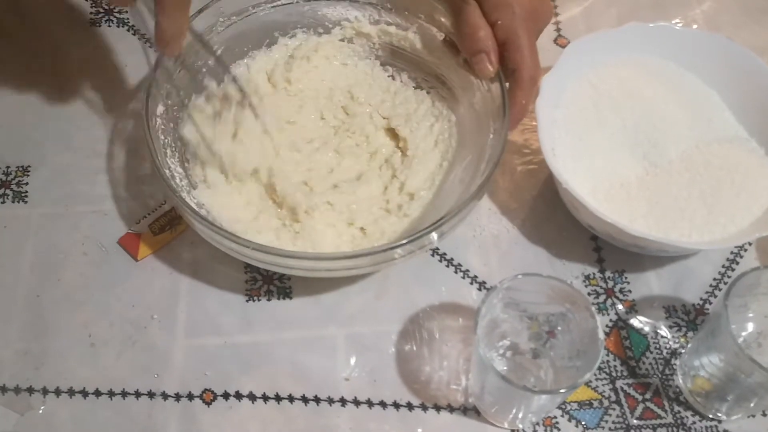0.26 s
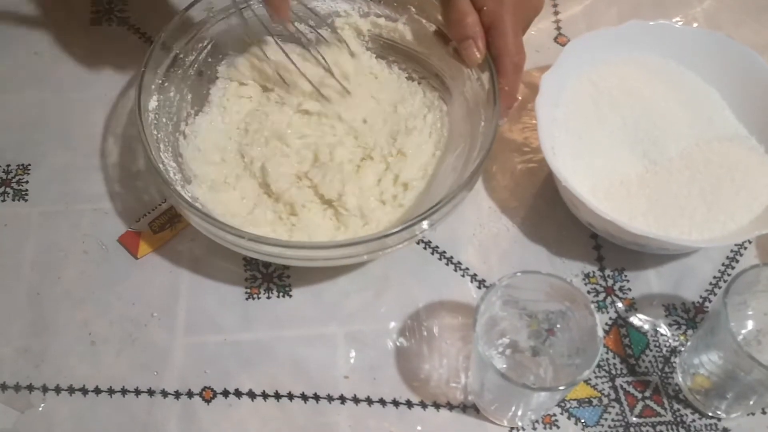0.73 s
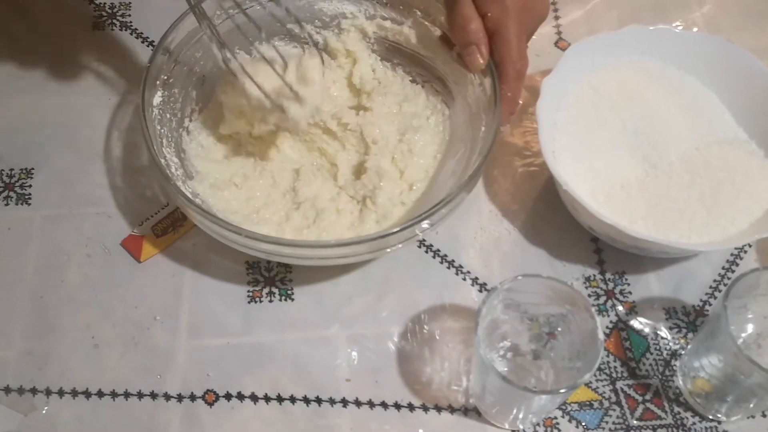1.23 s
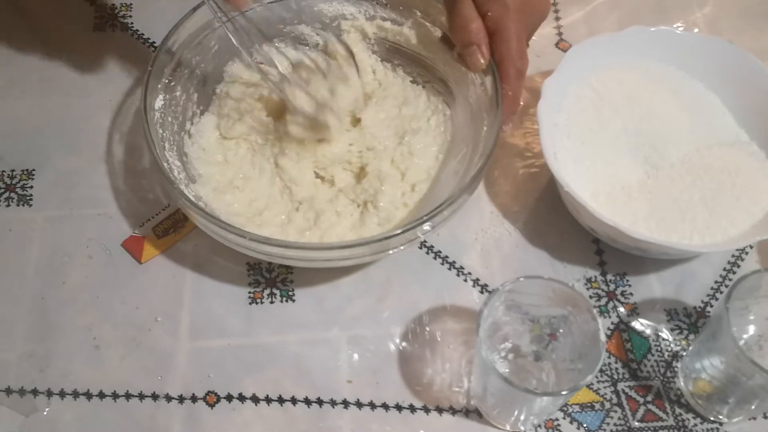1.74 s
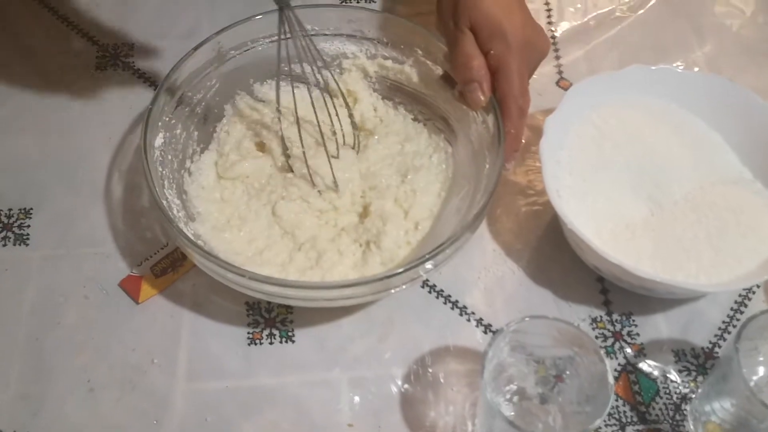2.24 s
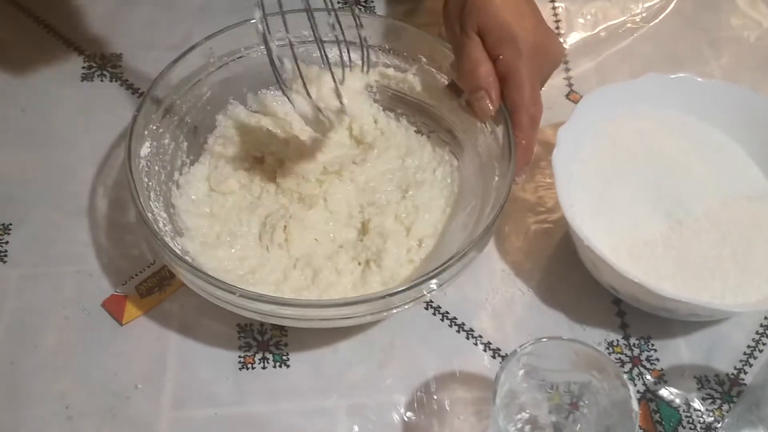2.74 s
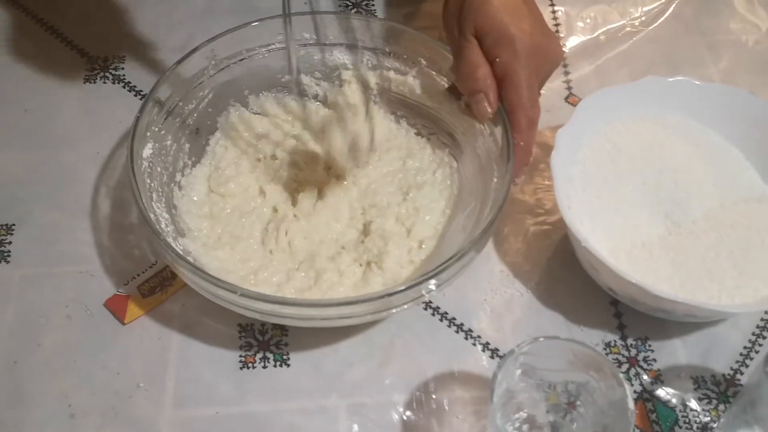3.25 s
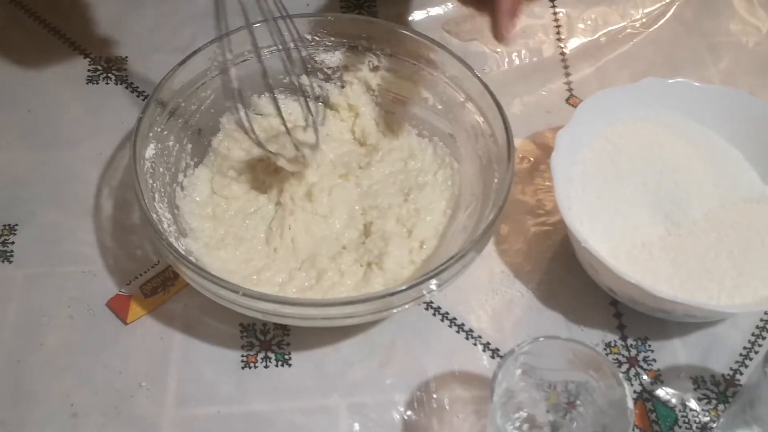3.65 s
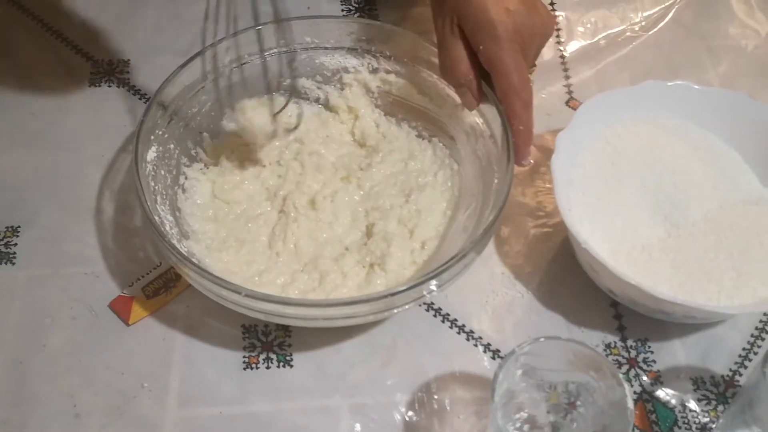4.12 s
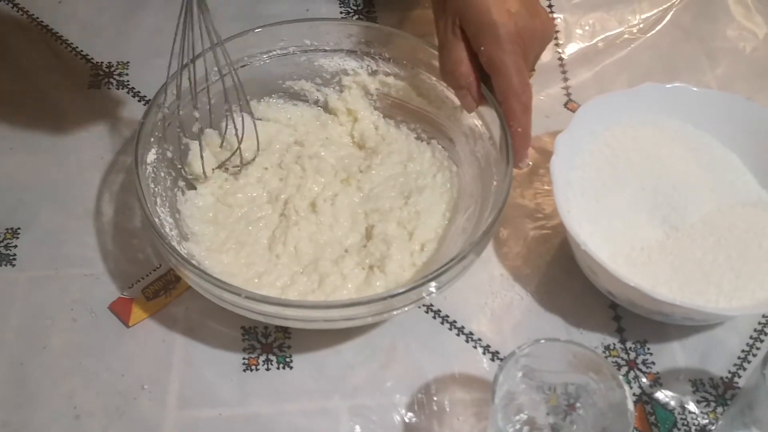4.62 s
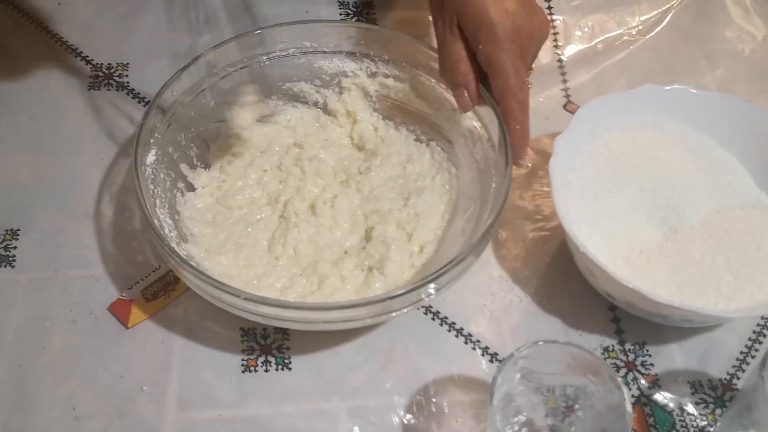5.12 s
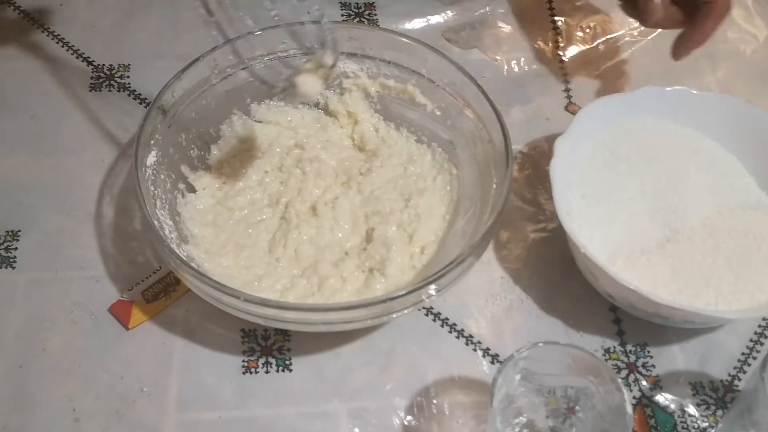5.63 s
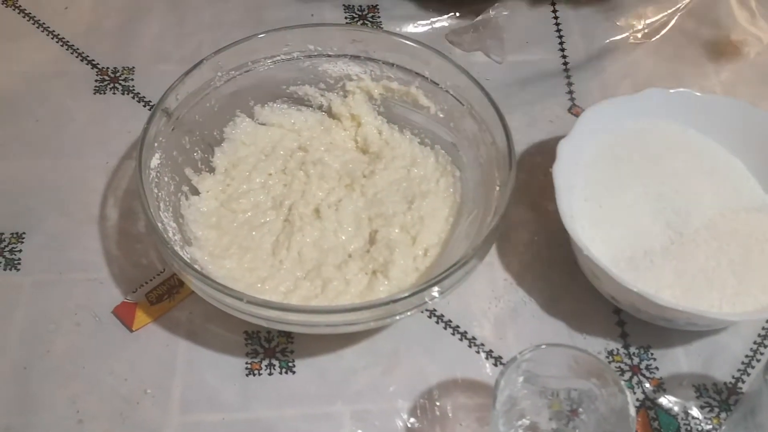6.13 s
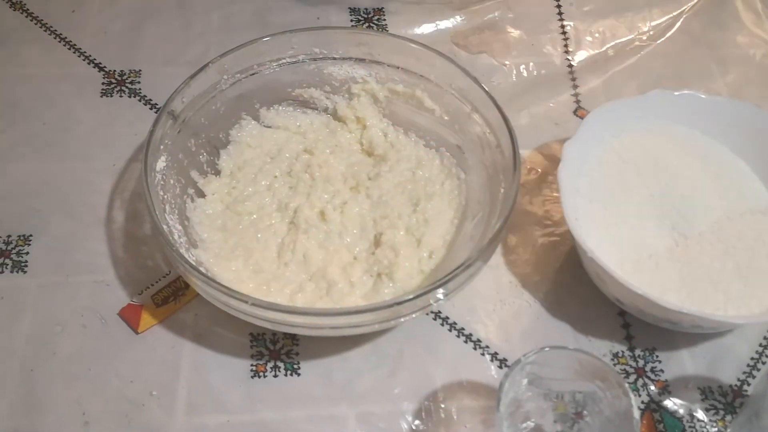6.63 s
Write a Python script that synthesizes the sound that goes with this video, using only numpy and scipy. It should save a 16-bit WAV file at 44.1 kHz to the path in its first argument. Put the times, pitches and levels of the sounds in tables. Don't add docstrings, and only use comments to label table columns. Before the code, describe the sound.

A wire whisk stirs sticky dough in a glass bowl, shakes off wet slaps, then knocks seven ringing clinks on the rim.

```python
import sys
import numpy as np
from scipy import signal
from scipy.fft import rfft, irfft, next_fast_len
from scipy.io import wavfile
from scipy.ndimage import uniform_filter1d

SR = 44100
rng = np.random.default_rng(int(sys.argv[2]) if len(sys.argv) > 2 else 0)


def bounce(signal):
    frames = np.transpose(np.atleast_2d(signal))
    limited = np.clip(frames, -1, 1)
    pcm = np.round(limited * 32767).astype(np.int16)
    wavfile.write(sys.argv[1], SR, pcm)


def to_linear_factor(level_db):
    exponent = np.asarray(level_db, float) / 20
    return 10 ** exponent


N = 302967
T = np.arange(N) / SR


def shaped(x, points):
    hz, db = np.transpose(points)
    size = next_fast_len(x.shape[-1])
    bins = np.log(np.maximum(np.arange(size // 2 + 1) * SR / size, 1))
    y = irfft(rfft(x, size) * to_linear_factor(np.interp(bins, np.log(hz), db)), size)[..., :x.shape[-1]]
    return y / np.sqrt(np.mean(y ** 2))


def fade(t, t60):
    return to_linear_factor(-60 * t / max(t60, 1e-3))


def walk(rate_hz):
    k = int(SR / rate_hz)
    held = np.repeat(rng.standard_normal(N // k + 1), k)
    return 1.25 * uniform_filter1d(uniform_filter1d(held, k), k)[:N]


def swell(s, held_s, db, rise_db_s, fall_db_s):
    return to_linear_factor(db - rise_db_s * np.maximum(s - T, 0) - fall_db_s * np.maximum(T - s - held_s, 0))


def add(out, s, sound, pan_db=0):
    i = int(s * SR)
    n = min(sound.shape[-1], N - i)
    out[:, i:i + n] += sound[..., :n] * to_linear_factor(np.array([[pan_db], [-pan_db]]) / 2)


def air():
    # frequency in Hz, level in dB per Hz.
    air_spectrum = [(12, -36), (20, -5), (150, -10), (193, -18.5), (248, -19), (293, -20), (459, -25.5),
                    (642, -29.5), (849, -25.5), (1440, -25), (2080, -19), (2990, -28.5), (5680, -35),
                    (14700, -45), (16000, -48.5)]
    air_db, hum_hz, hum_db = -65.5, 241, -77
    mid, side = rng.standard_normal((2, N))
    side = signal.sosfilt(signal.butter(1, 700, "high", fs=SR, output="sos"), side)
    noise = shaped(mid + 2.0 * side * np.array([[1], [-1]]), air_spectrum) * to_linear_factor(air_db + 1.2 * walk(2.4))
    hum = np.sin(2 * np.pi * hum_hz * T + .5 * walk(7.9))
    return noise + to_linear_factor(hum_db + 2.8 * walk(13.0)) * hum


def dough():
    # start in s, held in s, hiss in dB, 2 kHz rub in dB relative.
    stroke_rows = [(0.0, 0.18, -56, -1.5), (.24, 0.094, -52.5, 0.5), (0.369, 0.1, -51, -1),
                   (0.722, 0.08, -58, 5.5), (.89, 0.076, -51, -7.5), (1.018, 0.21, -60, -6),
                   (.8, 0.052, -75.5, 9.5), (1.07, 0.031, -71.5, 7), (1.15, .06, -82.5, 11),
                   (1.36, 0.049, -78.5, 16.5), (1.46, 0.072, -66.5, 8.5), (1.88, 0.11, -79.5, 14.5),
                   (2.05, 0.22, -85.5, 13.5), (3.525, 0.016, -75.5, -4), (3.57, 0.054, -69.5, -3.5),
                   (3.785, 0.02, -64, -4), (3.872, 0.01, -65, -9), (1.64, 0.036, -58, -12.5),
                   (2.68, 0.015, -65, -4), (2.91, 0.013, -83, -13), (3.13, 0.031, -77.5, 3),
                   (5.805, 0.014, -78, 8), (2.29, 0.077, -83, 26.5), (2.392, 0.026, -54, 3),
                   (5.562, 0.035, -60.5, 8.5), (5.829, 0.1, -44, -0.5), (6.001, 0.11, -53, -2),
                   (6.212, 0.021, -59, 6.5), (6.369, 0.033, -63, 0.5), (6.44, 0.036, -59, 5.5)]
    # time in s, hiss in dB, 2 kHz rub in dB relative.
    peel_rows = [(0.687, -52.5, 10), (1.534, -32.5, -6), (1.781, -51.5, -7), (2.596, -47.5, 2.5),
                 (2.652, -52, 5), (2.817, -52.5, -1.5), (2.89, -49, -13), (3.059, -51.5, -6),
                 (3.115, -57, 1), (3.298, -53, -1.5), (3.358, -66, 16.5), (3.514, -66, 9), (3.6, -67, 4),
                 (3.815, -81, 24)]
    # start in s, held in s, level in dB.
    fold_rows = [(.39, 0.049, -72), (.74, 0.092, -70.5), (.92, 0.19, -76.5), (2.25, 0.11, -78.5),
                 (2.39, 0.15, -75), (2.62, 0.092, -74), (3.1, 0.21, -79)]
    # frequency in Hz, level in dB per Hz.
    hiss_spectrum = [(1650, -35.5), (2800, -10.5), (3240, -12), (3640, 0), (3860, -14.5), (4400, -4.5),
                     (5680, 2.5), (6200, -1.5), (11000, -5), (14700, -20), (15500, -16), (16000, -50.5)]
    # frequency in Hz, level in dB per Hz.
    rub_spectrum = [(240, -40.5), (400, -42.5), (537, -54), (775, -22), (898, -25.5), (1260, -15.5),
                    (2090, 1), (2470, -3.5), (3600, -13.5), (4680, -20), (7920, -120)]
    # frequency in Hz, level in dB per Hz.
    fold_spectrum = [(300, -24), (520, -5), (650, -8.5), (830, 5.5), (1000, -10.5), (1500, -27)]
    # centre in Hz, width in Hz, level in dB.
    squeak_rows = [(830, 160, -20.5), (1304, 200, -16.5), (1795, 150, -9), (2117, 140, -12.5),
                   (2520, 180, -15)]
    stroke_db_s = 331, 289.5
    peel_db_s = 3000, 314
    hiss_spread = 1

    hiss_grains, rub_grains, side_grains = [
        rng.standard_normal(N) * to_linear_factor(3 * np.minimum(rng.exponential(size=N), 4.5)) for _ in range(3)]

    hiss = shaped(hiss_grains + hiss_spread * side_grains * np.array([[1], [-1]]), hiss_spectrum)
    hiss = hiss * to_linear_factor(2.0 * walk(34) + 2.0 * walk(110)) * to_linear_factor(np.array([[1.0], [-1.0]]))

    rub = shaped(rub_grains, rub_spectrum) * to_linear_factor(1.4 * walk(65) + 2.1 * walk(180))
    rub = rub * to_linear_factor(np.array([[-3.0], [3.0]]))
    for hz, width, db in squeak_rows:
        peak = [(hz - 3 * width, -40), (hz - width / 2, -3), (hz, 0), (hz + width / 2, -3), (hz + 3 * width, -40)]
        band = shaped(rub_grains, peak)
        rub = rub + to_linear_factor(db + 6.0 * walk(18)) * band * to_linear_factor(np.array([[-3.5], [3.5]]))

    moves = [(swell(s, held, db, *stroke_db_s), rub_db) for s, held, db, rub_db in stroke_rows]
    moves += [(swell(s, 0, db, *peel_db_s), rub_db) for s, db, rub_db in peel_rows]
    hiss_gain = sum(gain for gain, _ in moves)
    rub_gain = sum(gain * to_linear_factor(rub_db) for gain, rub_db in moves)

    fold_gain = sum(swell(s, held, db, *stroke_db_s) for s, held, db in fold_rows)
    fold = shaped(side_grains, fold_spectrum) * to_linear_factor(2.5 * walk(29.92)) * fold_gain
    return fold + to_linear_factor(-10.0) * (hiss * hiss_gain + rub * rub_gain)


def table():
    # time in s, peak in dB, boom in Hz, boom t60 in s, panels in dB relative.
    blow_rows = [(0.691, -54, 50, 0.76, -7), (1.531, -39.5, 43.4, 0.59, 5), (2.597, -34.5, 57.1, 0.31, -15),
                 (2.821, -40, 56.6, 0.15, -19.5), (2.891, -52, 57.3, 0.19, -11.5),
                 (3.063, -40, 58.8, 0.35, -22.5), (3.2985, -35, 59.7, 0.19, -21.5),
                 (3.515, -51, 52.4, 0.51, -12.5), (3.813, -34.5, 49.3, 0.16, -32),
                 (3.875, -45, 46.7, 0.18, -31.5), (3.941, -36, 57.5, 0.39, 0.5),
                 (4.29, -30, 60.1, 0.51, -6.5), (4.593, -32.5, 59.8, 0.49, -0.5),
                 (4.814, -36, 59.8, 0.39, -3.5), (4.995, -44.5, 59, 0.3, 1),
                 (5.167, -46.5, 51.4, 0.74, 9.5), (5.334, -54.5, 45.7, 0.47, 9.5)]
    # frequency in Hz, level in dB, t60 in s.
    panel_modes = [(165, -7, 0.16), (191, -13.5, 0.21), (260.3, 6, 0.1), (290, -9.5, 0.12),
                   (306, -11, 0.29), (439.6, -17.5, 0.023), (620, -9.5, 0.078), (895, -10, 0.16)]
    # time in s, rumble in dB.
    rocking_rows = [(0.0, -48.5), (0.2, -58.5), (0.36, -66), (0.75, -82), (1.4, -61.5), (2.2, -58),
                    (3.7, -67.5), (5.6, -61.5), (5.85, -72.5), (6.3, -81), (6.85, -61)]
    push_s = 0.0046
    panel_drift, panel_scatter_db = .04, 2.5
    rock_after_blow_db, rock_fall_db_s, rock_spread = -12.5, 75, .25

    out, t = np.zeros((2, N)), T[:SR // 2]
    dent = to_linear_factor(2.5) * np.sin(2 * np.pi * 154.3 * t) * fade(t, 0.024)
    thud = to_linear_factor(2) * np.sin(2 * np.pi * 85 * t + 2.0) * fade(t, 0.11)
    sway = to_linear_factor(-3) * np.sin(2 * np.pi * 30.6 * t - .6) * fade(t, 0.14)
    push = (1 - np.exp(-t / push_s)) ** 2
    for s, db, hz, t60, panel_db in blow_rows:
        boom = np.sin(2 * np.pi * hz * t - 1.3) * fade(t, t60) + sway + dent
        drift = 1 + panel_drift * rng.standard_normal(len(panel_modes))
        modes = np.array([to_linear_factor(d) * np.sin(2 * np.pi * f * k * t) * fade(t, ring)
                          for (f, d, ring), k in zip(panel_modes, drift)])
        mode_gain = to_linear_factor(panel_db + panel_scatter_db * rng.standard_normal(len(panel_modes)))
        add(out, s, to_linear_factor(db) * (boom + thud + mode_gain @ modes) * push)

    noise = rng.standard_normal(N) + rock_spread * rng.standard_normal((2, N))
    rumble = shaped(noise, [(15, -25.0), (30, -0.5), (70, -5.0), (100, -6.0), (170, -20.0), (400, -62.5)])
    rock_s, rock_db = np.transpose(rocking_rows)
    rocking = to_linear_factor(np.interp(T, rock_s, rock_db, -110, -110))
    for s, db, *_ in blow_rows:
        rocking = rocking + (T > s) * swell(s, 0, db + rock_after_blow_db, 0, rock_fall_db_s)
    return out + rumble * rocking * to_linear_factor(-8.5 + 1.6 * walk(9.2))


def ticks():
    # time in s, treble peak in dB, 2 kHz slap in dB relative, brightness in dB per octave.
    tick_rows = [(0.237, -59, 6, -12), (0.272, -52.5, 14, -10), (0.409, -45, 4, -23),
                 (0.6864, -45.5, 18.5, -9), (0.6911, -34.5, -30, -13), (0.7289, -36, 3.5, -10),
                 (0.392, -61, 21, -8), (1.171, -46, 3.5, 1), (1.522, -31.5, -6, -17),
                 (1.5354, -24.5, 9, -26), (1.5445, -38, 14, -13), (1.78, -41.5, -3, -5.5),
                 (1.9028, -59, 10, 0), (5.813, -60.5, 12, -3), (2.387, -35.5, -0.5, 5),
                 (2.6, -28, -11, -20), (2.655, -30.5, -4.5, -22), (2.6694, -45.5, -16, 12),
                 (2.82, -45.5, -4, -5), (2.894, -44, 9, -18), (3.0607, -47, 2, 5), (3.069, -55, -2, -14),
                 (3.1158, -38, -19, 3), (3.1647, -53, -1, -10), (3.3024, -34.5, -15, -15),
                 (3.3609, -28.5, -23, -21.5), (3.519, -49.5, -16, -22), (3.61, -62, -12, 5),
                 (3.8147, -63.5, 13, -5), (2.595, -43, 3, -16), (2.781, -62, -15, -3),
                 (2.876, -49, -19, -22), (3.295, -57, -15, 6), (3.345, -50, -15, -20),
                 (3.352, -50, -15, -18), (3.366, -42, -7, -21), (3.819, -64, 15, -12), (3.833, -66, 11, -1),
                 (1.526, -40, 11, -16)]
    # frequency in Hz, level in dB per Hz.
    tick_spectrum = [(1760, -46), (3000, -21), (4300, -16), (5600, 5.5), (6700, 0), (9800, 11),
                     (13500, -25), (16000, -48)]
    # frequency in Hz, level in dB per Hz.
    slap_spectrum = [(150, -53.5), (250, -15.5), (340, -16), (514, -38), (758, -10), (1110, -25), (1800, 2),
                     (2120, 8), (2650, -15.5), (2950, -9.5), (4200, -30), (5460, -65), (9240, -120)]
    tick_pan_db, tick_scatter_db, slap_pan_db = 12, 10.5, -7.5

    out, t = np.zeros((2, N)), T[:SR // 8]
    tail = 0.29 * fade(t, 0.057)
    for s, db, slap_db, tilt_db in tick_rows:
        pan_db = tick_pan_db + tick_scatter_db * rng.standard_normal()
        noise = rng.standard_normal((2, len(t)))
        noise[:, 24] = 9
        tilted = [(hz, d + tilt_db * np.log2(hz / 6000)) for hz, d in tick_spectrum]
        tick = shaped(noise[0], tilted) * (fade(t, 0.0021) + tail)
        slap = shaped(noise[1], slap_spectrum) * (fade(t, 0.047) + tail)
        add(out, s, to_linear_factor(db - 11.0) * tick, pan_db)
        add(out, s, to_linear_factor(db - 12.0 + slap_db) * slap, slap_pan_db)
    return out


def ported(points, share, low_db):
    # frequency in Hz, left minus right in dB.
    clatter_pan = [(700, 13), (1800, -5.5), (4200, 3), (6500, 7), (10000, -6.5), (14000, -1.5)]
    hz, db = np.transpose(clatter_pan)
    return [(f, d + share * np.interp(np.log(f), np.log(hz), db) + low_db * (f < 1500)) for f, d in points]


def rim():
    # time in s, ring in dB, brightness in dB per octave, place on the rim in radians,
    # clatter in dB.
    knock_rows = [
        (0.2837, -35.5, -4, 0.035, -55),
        (3.9412, -8, 2.2, 0.085, -12.5),
        (4.2878, 1.5, -7, -0.082, -13),
        (4.5961, 0, -1, -0.041, -13.5),
        (4.8087, -11, 5, 0.08, -21.5),
        (4.9923, -9, 4, -0.19, -14.5),
        (5.1633, -9.5, 7.5, 0.017, -13),
        (5.3291, 0.5, 1, -0.063, -18),
    ]
    # second wire's gap in s, second wire in dB, third wire in dB,
    # share of the free ring time the dough allows.
    late_wires = [(0.002, 6, 3, 0.54), (.0035, 0, -3.5, 1.11), (.0028, 2.5, 3.5, 1.17),
                  (0.0024, -4.5, 3.5, 0.97), (0.007, 9.5, -4, 0.86), (0.0026, -1.5, 3, 1.4),
                  (.004, 3, 2, 0.86), (0.005, 5.5, 0.1, 0.97)]
    last_wires_s = [.0032, 0.0086, .0056, .0055, 0.018, 0.0045, .009, 0.009]
    clatter_low_db = [-3.1, 2.5, 3.5, -0.4, 0.3, -2.5, -0.2, -7]
    # frequency in Hz, level in dB per Hz.
    clatter_spectrum = [(180, -59), (300, -31.5), (856, -21.5), (2280, 1), (2880, -17), (3700, 6.5),
                        (3950, -29.5), (4200, -35.5), (4480, -11), (4990, 1.5), (5610, -9), (6620, -1),
                        (12300, -11), (14500, -24), (15600, -49.5)]
    # frequency in Hz, t60 in s.
    rim_modes = [(485, .45), (1262, .28), (1245, .15), (2293, .2), (2313, .12), (3537, .22), (3678, .05),
                 (4945, .2), (5090, .12), (6556, .24), (6966, .2), (8275, .17), (8408, .12), (10125, .22),
                 (12140, .16), (14240, .16)]
    held_share = [1.15, 0.84, 0.68, 1.133, 1.1, 1.1, 1.2, 0.85, 0.79, 0.96, 1.2, 0.94, 0.96, 1.1, 1.3, 1.05]
    # level in dB, left minus right in dB, left port's lead in radians.
    radiation = [(-8, -7, 0.32), (10, -3.5, 1.7), (0, -2.5, 0.62), (-2.5, -11, 1.5), (-16, -3.5, 4.2),
                 (3, 2, 2.17), (-2, -0.5, 2.4), (-1, 1.5, 0.95), (-5, 2, 2.2), (6, 4.5, 4.12),
                 (-19, 0.5, 1.6), (-4.5, -2, 2.1), (-1.5, 9.5, 0.52), (1, -14, 2.4), (-5.5, -7, 4.7),
                 (-3, -6, 1.6)]
    # level in dB when struck on a crest,
    # radians from the zero mark to a crest times the wave count.
    wave_rows = [(-26.5, 1.35), (-29, 2.9), (3, 1.04), (-3.5, .84), (-9, 1.25), (-19, .14), (-17, 2.66),
                 (-23, 2.4), (-13.5, 2.29), (-21.5, 2.11)]
    # level of 2, 3, 4, 5, 6, 7 waves in dB.
    grip_rows = [(0.1, -9, -2, -0.5, 3, -2), (0.1, -4, 0.67, -8, -2.9, 6.5), (0.1, -4.5, 0.1, 1, 1, -3),
                 (0.09, 1, 0.1, -6, -9, -1.5), (4.3, -0.5, 0.1, 0, -0.5, -2.5),
                 (3.6, -4.5, -2.7, 2, 0.5, 7.5), (18, -1.5, -2, -0.8, -0.5, -1.4),
                 (0.12, -2, -0.56, -8.5, 5.5, -0.4)]
    # level of 8, 9, 10, 11 waves in dB.
    grip_high_rows = [(-2, .1, .1, .1), (1, .1, -3, 2.1), (-2, .1, 0.5, .1), (1.7, .1, -1.5, 2.1),
                      (0.8, .1, -2.1, 2.1), (.1, 1.1, 0, 2.1), (-2.3, .1, -1.5, 2.1), (-2.5, .1, -2.5, 2.1)]
    # twins of 4, 5, 6, 7 waves in dB,
    # ring left minus right in dB.
    twin_rows = [(.1, .1, .1, .1, -4.5), (3.1, .1, .1, 1.3, -0.5), (3.1, .1, 0.12, 1.3, -0.6),
                 (.1, .1, .1, .1, 1.5), (.1, .1, .1, 4, 0.5), (.1, .1, .1, 0.3, 1.9),
                 (3.1, 1.9, .1, -3.3, -0.3), (.1, .1, .1, -2.2, 1.5)]
    # time after the knock in s, loss in dB,
    # share of the ring that dies early.
    settle_rows = [(.03, -6, 1), (.09, -15, 0.4), (0.088, -2, 0.7), (0.025, -2.5, 0.86), (0.028, -4, 0.93),
                   (0.018, -2.5, 1.5), (0.0088, -1, 0.98), (.05, -0.5, 1.1)]
    settle_s, node_leak = 0.0051, .02

    out, wire_noise, t = np.zeros((2, N)), np.zeros((2, N)), T[:SR // 3]
    noise_t = t[:2000]
    hz, t60 = np.transpose(rim_modes)[:, :, None]
    mode_db, pan_db, lead = np.transpose(radiation)[:, :, None]
    port_gain = to_linear_factor(np.array([pan_db, -pan_db]) / 2)
    port_phase = np.exp(1j * np.array([lead, 0 * lead]))
    order = np.array([2, 3, 3, 4, 4, 5, 5, 6, 6, 7, 7, 8, 8, 9, 10, 11])[:, None]
    crest_db, crest = np.transpose(wave_rows)[:, order - 2]
    rough_depth = np.where((order == 4) | (order > 8), .55, .36)

    rows = zip(knock_rows, late_wires, last_wires_s, clatter_low_db,
               grip_rows, grip_high_rows, twin_rows, settle_rows)
    for knock, late, last_s, low_db, grip_db, high_db, (*twin_db, side_db), settle in rows:
        s, db, tilt_db, place, clatter_db = knock
        gap_s, late_db, last_db, free = late
        settle_at_s, lost_db, early = settle

        share_db = crest_db + 10 * np.log10(np.cos(order * place - crest) ** 2 + node_leak)
        share_db = share_db + tilt_db * np.log2(np.maximum(hz / 2300, 1))
        share_db = share_db + np.append(grip_db, high_db)[order - 2]
        share_db[4:11:2, 0] += twin_db

        swing, total = 0, 0
        for delay, wire_db in [(0.00033, 0.0053), (gap_s, late_db), (last_s, last_db)]:
            push = to_linear_factor(wire_db) * np.exp(.7j * rng.standard_normal(hz.shape))
            swing = swing + push * np.sin(np.pi / 2 * np.clip((t - delay) / .0006, 0, 1)) ** 2
            total = total + push
            noise = rng.standard_normal(2000) + 10.0 * rng.standard_normal((2, 2000))
            clatter = np.array([shaped(port, ported(clatter_spectrum, side, low_db))
                                for port, side in zip(noise, (.5, -.5))])
            clatter = clatter * fade(noise_t, 0.024) * np.minimum(noise_t / 0.00045, 1)
            add(wire_noise, s + delay, to_linear_factor(clatter_db + wire_db) * clatter, 0.3)

        detuned_hz = hz * (1 + .002 * rng.standard_normal(hz.shape))
        decay = to_linear_factor(-60 * t / (t60 * free * np.array(held_share)[:, None]))
        decay = decay * (0.33 + early * (hz > 2000) * fade(t, 0.055))
        decay = decay * to_linear_factor(lost_db * np.clip((t - settle_at_s) / settle_s, 0, 1))
        ring = swing / np.abs(total) * np.exp(2j * np.pi * detuned_hz * t)
        ring = ring * to_linear_factor(db + mode_db + share_db) * decay

        jolts = rng.standard_normal((2, len(hz), 41)) + 1j * rng.standard_normal((2, len(hz), 41))
        jolts = signal.resample(jolts, len(t), axis=-1)
        rough = 1 + rough_depth * np.minimum(t / .04, 1) * jolts
        add(out, s, np.sum(ring * rough * port_gain * port_phase, axis=1).imag, side_db)
    return out, wire_noise


def band_clicks(rows):
    out, t = np.zeros((2, N)), T[:2000]
    for s, db, hz, pan_db, t60 in rows:
        band = [(hz / 5, -22), (hz / 1.4, -3), (hz, 0), (hz * 1.3, -6), (hz * 1.8, -30)]
        click = shaped(rng.standard_normal(len(t)), band)
        add(out, s, to_linear_factor(db - 9.0) * click * fade(t, t60), pan_db)
    return out


def lumps():
    # time in s, peak in dB, centre in Hz, left minus right in dB, t60 in s.
    lump_rows = [
        (1.534, -29, 780, .1, .05),
        (1.535, -27, 270, .1, .07),
        (1.541, -25, 2100, -6, .045),
        (.687, -45, 920, .1, .04),
        (5.813, -42.5, 2300, -5, .025),
        (1.78, -49, 1250, -1, .03),
    ]
    return band_clicks(lump_rows)


def housing():
    # time in s, peak in dB, centre in Hz, left minus right in dB, t60 in s.
    creak_rows = [(2.3042, -39, 8600, -35, 0.0048), (2.3194, -66, 7320, -2.0, 0.0052),
                  (3.5744, -52, 9540, 3, 0.0073), (3.6534, -54, 6700, -9.5, 0.006),
                  (3.6944, -55.5, 7030, -4.5, 0.006), (3.7364, -58, 10800, -12, 0.0053),
                  (3.7494, -56.5, 11000, -15, 0.006), (3.7694, -58, 7430, -20, 0.006),
                  (3.8154, -61, 10700, -12.5, 0.006), (3.8394, -63, 6060, -3, 0.006),
                  (3.8494, -57, 11700, -3, 0.006), (3.8736, -53, 11100, -22, 0.006)]
    # time in s, peak in dB, centre in Hz, left minus right in dB, t60 in s.
    bump_rows = [
        (3.815, -45.5, 330, -18.5, 0.082),
        (1.903, -48, 1100, -6, .02),
        (3.302, -45, 2200, -9, 0.04),
    ]
    return band_clicks([*creak_rows, *bump_rows])


def chatter():
    # time in s, level in dB, t60 in s.
    chatter_rows = [(3.95, -42.5, 0.37), (4.295, -42.5, 0.32), (4.603, -41.5, 0.32), (4.814, -47, 0.33),
                    (5.0, -43, 0.52), (5.172, -56, 0.34), (5.337, -53, 0.38)]
    # frequency in Hz, level in dB per Hz.
    chatter_spectrum = [(200, -26), (290, -7), (380, -13), (480, 3), (620, -12), (1100, -3.5), (1700, -0.5),
                        (2600, -27)]
    out, t = np.zeros((2, N)), T[:SR // 3]
    for s, db, t60 in chatter_rows:
        grains = rng.standard_normal((2, len(t))) * to_linear_factor(2 * np.minimum(rng.exponential(size=len(t)), 5))
        rattle = shaped(grains, chatter_spectrum) * fade(t, t60) * (1 - np.exp(-t / .012))
        add(out, s, to_linear_factor(db) * rattle, -2.5)
    return out


def kitchen(dry):
    # frequency in Hz, t60 in s.
    kitchen_t60 = [(200, 0.51), (1000, 0.36), (3000, 0.28), (8000, 0.27), (13000, .2), (16000, 0.13)]
    kitchen_db = -8.5
    t, tail = T[:SR // 2], 0
    room_hz, room_t60 = np.transpose(kitchen_t60)
    for hz in 125 * 2 ** np.arange(8):
        band = [(hz / 2, -40), (hz / 1.4, 0), (hz * 1.4, 0), (hz * 2, -40)]
        octave = shaped(rng.standard_normal((2, len(t))), band)
        tail = tail + np.sqrt(hz) * octave * fade(t, np.interp(np.log(hz), np.log(room_hz), room_t60))
    tail = tail * np.clip((t - .002) / 0.0014, 0, 1)
    tail = signal.sosfilt(signal.butter(4, 14300, fs=SR, output="sos"), tail)
    tail = signal.lfilter(*signal.iirnotch(4180, 8.4, fs=SR), tail)
    tail = tail / np.sqrt(np.sum(tail ** 2, axis=1, keepdims=True))
    return to_linear_factor(kitchen_db) * signal.fftconvolve(dry, tail, axes=1)[:, :N]


def scene():
    ring_echo_db, dough_echo_db, table_echo_db = -6.5, -2.5, -6
    away_s, port_lag, away_lag = 5.54, 8, -26
    stir = dough() + ticks()
    boom = table()
    ring, clatter = rim()
    echo = kitchen(clatter + to_linear_factor(ring_echo_db) * ring + to_linear_factor(dough_echo_db) * stir + to_linear_factor(table_echo_db) * boom)
    bowl = clatter + stir
    bowl[1] = np.where(T < away_s, np.roll(bowl[1], port_lag), np.roll(bowl[1], away_lag))
    return air() + boom + bowl + ring + lumps() + housing() + chatter() + echo


def low_pass(x):
    return signal.sosfilt(signal.butter(12, 16530, fs=SR, output="sos"), x)


def record(dry):
    top_hz = 15900
    lowpass = signal.ellip(6, .5, 50, top_hz, fs=SR, output="sos")
    return low_pass(signal.sosfilt(lowpass, np.tanh(dry)))


dry = scene()
out = record(dry)
bounce(out)
```